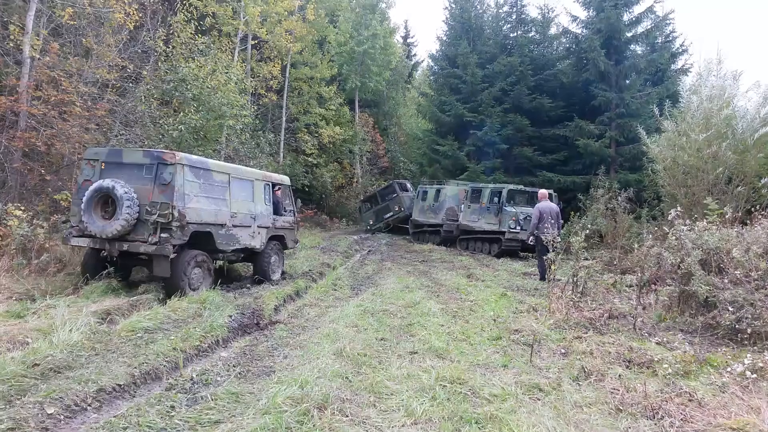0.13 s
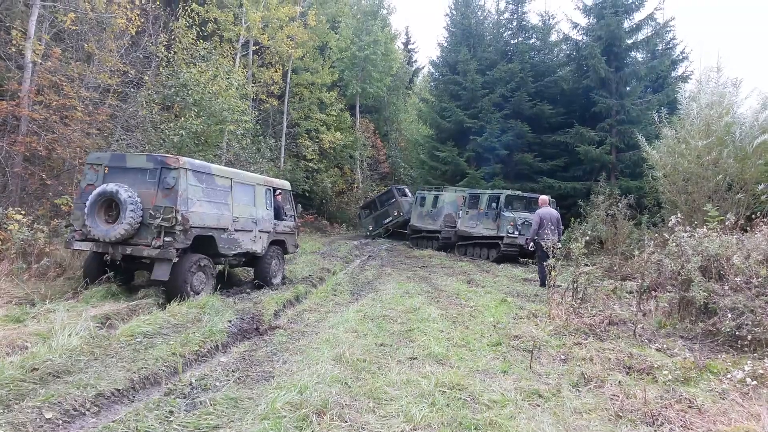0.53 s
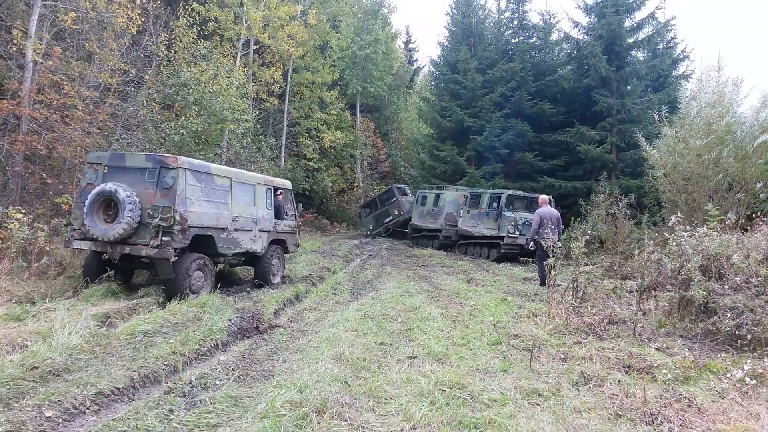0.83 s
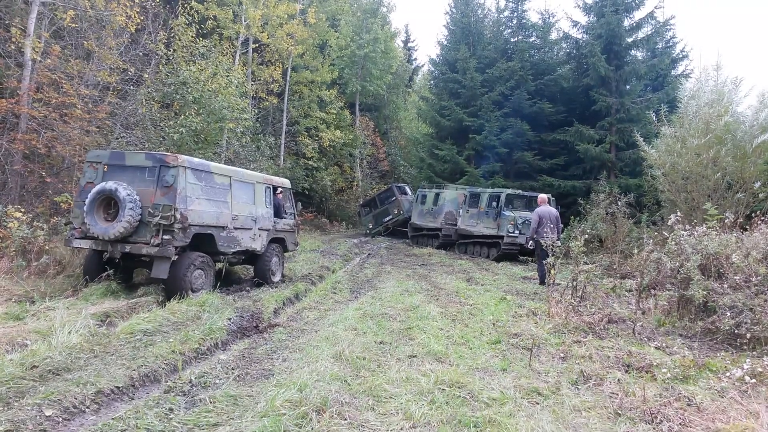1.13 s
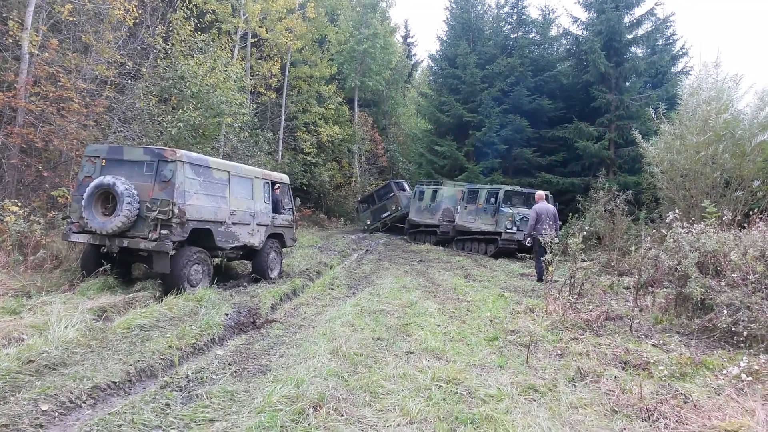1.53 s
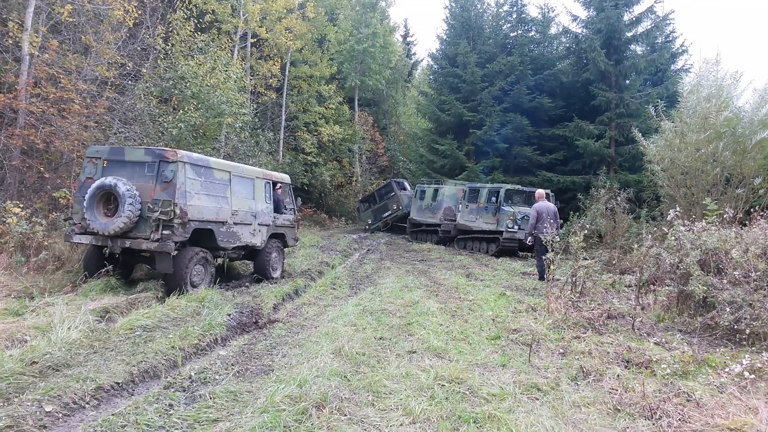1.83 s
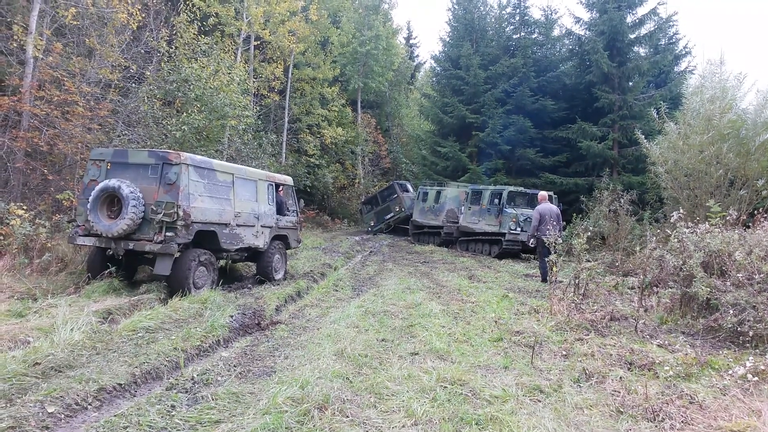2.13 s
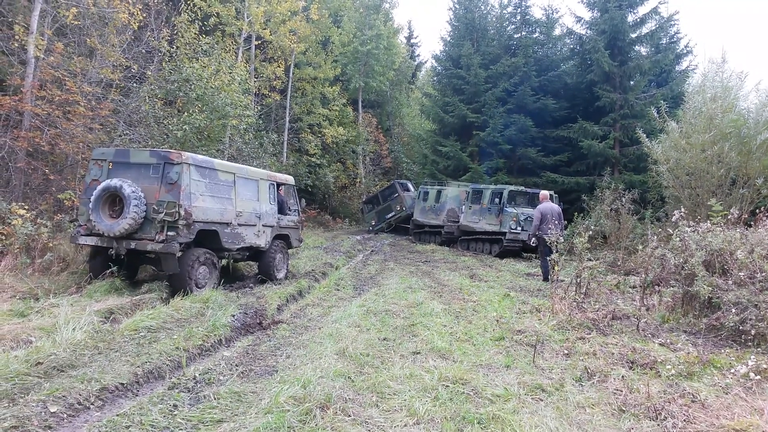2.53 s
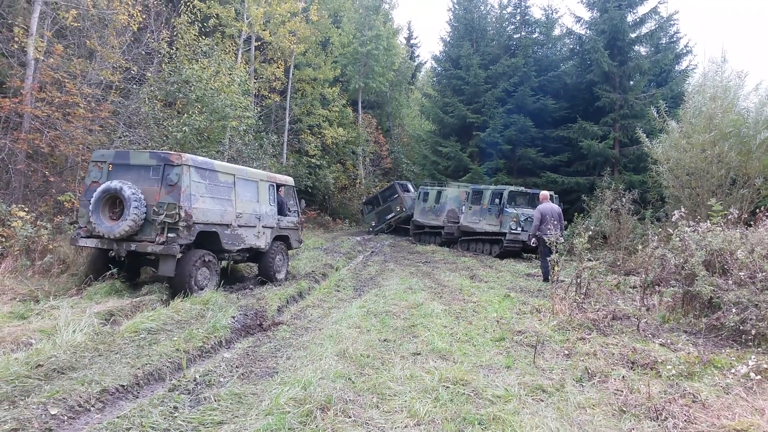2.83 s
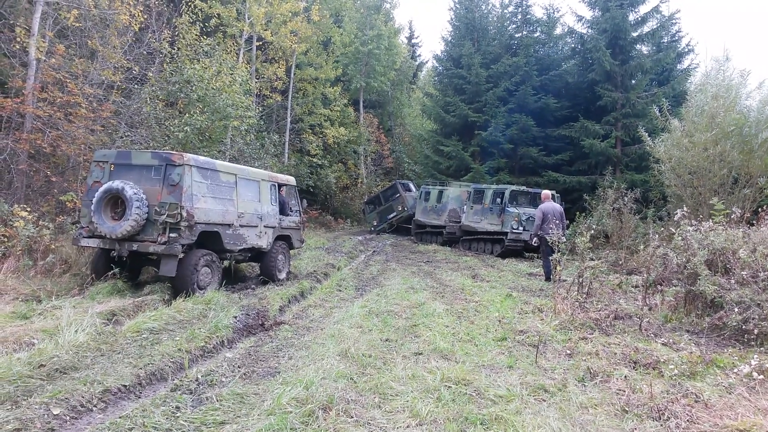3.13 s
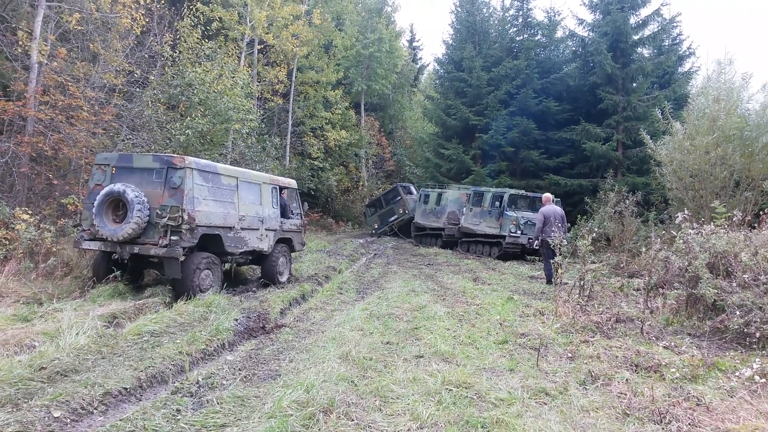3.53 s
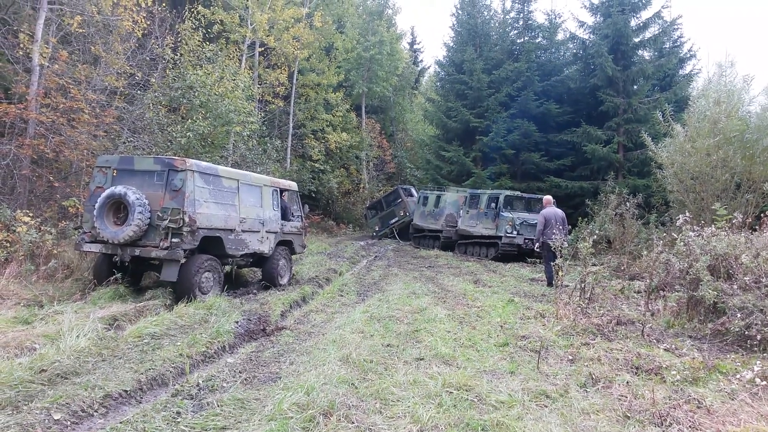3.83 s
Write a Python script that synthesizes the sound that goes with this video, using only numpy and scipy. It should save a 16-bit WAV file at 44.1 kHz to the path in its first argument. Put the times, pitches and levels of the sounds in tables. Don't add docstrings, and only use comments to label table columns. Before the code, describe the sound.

Engines of heavy off-road vehicles on a muddy forest track: a quick rise in revs, then a throaty steady rumble with fluttering diesel hiss, picked up by a small stereo microphone with uneven treble between sides.

```python
import sys
import numpy as np
from scipy import signal
from scipy.fft import rfft, irfft, next_fast_len
from scipy.io import wavfile
from scipy.ndimage import uniform_filter1d, map_coordinates

SR = 44100
rng = np.random.default_rng(int(sys.argv[2]) if len(sys.argv) > 2 else 0)


def transcribe(signal):
    frames = np.atleast_2d(signal).T
    limited = np.clip(frames, -1, 1)
    pcm = np.round(limited * 32767).astype(np.int16)
    wavfile.write(sys.argv[1], SR, pcm)


def volts_from_db(level):
    exponent = np.asarray(level, float) / 20
    return 10 ** exponent


N = 176400


def unit(x):
    return x / np.sqrt(np.mean(x ** 2) + 1e-20)


def along(points, hz):
    f, v = np.transpose(points)
    return np.interp(np.log(hz + 1), np.log(f + 1), v)


def curves(rows):
    s, *cols = np.transpose(rows)
    t = np.arange(N) / SR
    return [uniform_filter1d(np.interp(t, s, c), size=SR // 20) for c in cols]


def wobble(rate):
    knots = rng.standard_normal(int(N * rate / SR) + 4)
    return map_coordinates(knots, [np.arange(N) * rate / SR])


def filtered(x, response):
    m = next_fast_len(N + 8192)
    run_out = x[..., :-4096:-1] * np.linspace(1, 0, num=4095)
    spectrum = rfft(np.concatenate([x, run_out], axis=-1), m)
    return irfft(spectrum * response(np.fft.rfftfreq(m, 1 / SR)), m)[..., :N]


def peaks(table, hz, floor_db):
    power = volts_from_db(2 * floor_db)
    for centre, width, db in table:
        power = power + volts_from_db(2 * db) / (1 + (2 * (hz - centre) / width) ** 2) ** 2
    return np.sqrt(power)


def turns(hz):
    return 2 * np.pi * np.cumsum(hz) / SR


def puffs(hz, share):
    # frequency in Hz, left-right likeness (1 is identical).
    likeness = [(60, 0.83), (130, 0.86), (280, 1), (620, 0.84), (1340, 0.79), (2910, 0.47), (6330, 0.11),
                (13800, -1.36)]
    narrowness, scatter_db = 1.05, 2.5
    gate = ((1 + np.cos(turns(hz))) / 2) ** narrowness * volts_from_db(scatter_db * wobble(60))
    pair = rng.standard_normal((2, N)) * (1 - share + share * unit(gate))
    pair = pair * volts_from_db(0.17 * wobble(2.136) + 0.41 * wobble(11))

    def mid_side(f):
        angle = np.arccos(np.clip(along(likeness, f), -1, 1)) / 2
        return np.array([np.cos(angle), np.sin(angle)])

    mid, side = filtered(pair, mid_side)
    return np.array([mid + side, mid - side])


def orders(hz, table, gain_db):
    flutter_db, drift_rad = .7, .06
    phase = turns(hz)
    total = 0
    for k, db in table:
        level = volts_from_db(db + gain_db(k) + flutter_db * np.sqrt(k) * wobble(9))
        total = total - np.sqrt(2) * level * np.cos(k * (phase + drift_rad * wobble(4.5)))
    return total


def truck_speed():
    knot_s = [.42, .6, .75, .88, 1.01, 1.12, 1.25, 1.4, 1.7, 2.05, 2.3, 2.6, 2.85, 3.08, 3.5, 4]
    knot_hz = [34, 43.5, 52, 57.5, 62, 64.6, 66.3, 66.9, 66.1, 64, 61.5, 59, 57.8, 57.2, 57.6, 57.9]
    hz, = curves(np.transpose([knot_s, knot_hz]))
    return hz, 20 * np.log10(hz / knot_hz[-1])


def truck_exhaust(hz, effort_db):
    # multiple of the firing rate, level in dB.
    exhaust_orders = [(1, -21.5), (1.5, -36), (2, -24), (2.5, -33), (3, -29), (3.5, -33), (4, -40),
                      (4.5, -39), (5, -42), (5.5, -42), (6, -37), (6.5, -35), (7, -44), (7.5, -42),
                      (8, -46)]
    # centre in Hz, width in Hz, level in dB.
    pipe = [(63, 44, 0), (87, 14, 0), (111, 32, 0), (162, 42, 0), (225, 32, 0), (318, 24, 0), (371, 34, 0)]
    pipe_floor_db = -12
    brightens, uneven = 1.1, -1.5

    def gain_db(k):
        if k % 1:
            push_db = uneven * abs(effort_db)
        else:
            push_db = effort_db * (1.2 + brightens * np.log(k))
        return push_db + 20 * np.log10(peaks(pipe, k * hz, pipe_floor_db))

    return orders(hz, exhaust_orders, gain_db)


def truck_roar(hz, speed_db, effort_db):
    # frequency in Hz, density in dB per Hz.
    gas_colour = [(20, -36), (45, -18), (75, -15), (120, -7.5), (160, -5.5), (232, -9), (250, -11),
                  (800, -27.5)]
    # centre in Hz, width in Hz, level in dB.
    silencer = [(209.4, 11.7, -1.5), (356.5, 20, 9)]
    colour = lambda f: volts_from_db(along(gas_colour, f)) * peaks(silencer, f, 0) * (f < 1200)
    roar = unit(filtered(puffs(hz, share=0.22), colour))
    return volts_from_db(-30.5 + .4 * effort_db + 1.2 * speed_db) * roar


def truck_block(hz, speed_db):
    # centre in Hz, width in Hz, level in dB.
    panels = [(477, 77, 3.5), (551, 59, -0.5), (643, 108, 0.5), (767, 130, -10), (1026, 120, -4.5),
              (1235, 165, -4), (1612, 170, -3), (1733, 72, -0.5), (1874, 118, 2), (1965, 144, 0),
              (2311, 122, -1.5)]
    edges = lambda f: f ** 4 / (f ** 4 + 400 ** 4) / (1 + (f / 2500) ** 6)
    colour = lambda f: edges(f) * peaks(panels, f, floor_db=-8.5)
    block = unit(filtered(puffs(hz, share=0.11), colour))
    return volts_from_db(-31 + 1.5 * speed_db) * block


def truck():
    # time in seconds, effort in dB.
    throttle = [
        (.42, -3),
        (.58, -5),
        (.7, 4),
        (.82, 0),
        (.95, -2),
        (1.5, 0.5),
        (2.2, -1),
        (2.6, -1),
        (3.2, -1),
        (4, -0.5),
    ]
    hz, speed_db = truck_speed()
    effort_db, = curves(throttle)
    tone = truck_exhaust(hz, effort_db)
    return tone + truck_roar(hz, speed_db, effort_db) + truck_block(hz, speed_db)


def carrier_hiss(hz):
    # frequency in Hz, density in dB per Hz.
    left_treble = [(1800, -35.5), (2500, -11), (3300, -7), (4300, -3), (5300, -11.5), (5900, -17.5),
                   (8500, -27.5), (9650, -116)]
    right_treble = [(1800, -12), (2600, -14), (5000, -13.5), (7200, -20.5), (9400, -11.5), (11000, -16),
                    (12600, -25), (13300, -54)]
    # centre in Hz, width in Hz, level in dB.
    left_cavity = [(3690, 230, 0), (4040, 160, 3.5), (4414, 240, 1.5), (4540, 150, 0.5), (5390, 160, 7.5)]
    right_cavity = [(3530, 300, -1), (4680, 300, 6), (5700, 1000, -1), (6600, 500, 5.5), (6860, 97, -8),
                    (9440, 180, 5), (10020, 300, 3), (11560, 140, -3)]

    def colour(f):
        treble = volts_from_db([along(left_treble, f), along(right_treble, f)])
        return treble * (f > 1200) * [peaks(left_cavity, f, 0), peaks(right_cavity, f, 0)]

    hiss = unit(filtered(puffs(hz, share=0.21), colour))
    fan_db = .6 * truck_speed()[1]
    return volts_from_db(-29 + fan_db) * hiss


def carrier():
    # time in seconds, firing rate in Hz, level in dB.
    cruise = [
        (.42, 80, -27),
        (1, 78.2, -27),
        (1.5, 77, -26.5),
        (2.3, 76.5, -28),
        (2.9, 77.2, -28),
        (3.4, 78.6, -28),
        (4, 79.7, -27),
    ]
    # multiple of the firing rate, level in dB.
    drone_orders = [(1, 0), (2, -10), (3, -17), (4, -20), (5, -22)]
    hz, level_db = curves(cruise)
    return orders(hz, drone_orders, lambda k: level_db), carrier_hiss(hz)


def surge():
    # time in seconds, firing rate in Hz, level in dB.
    swells = [(.42, 82.6, -32), (.58, 77.63, -25), (.72, 70.16, -45), (.87, 61.3, -26), (1, 61.4, -37),
              (1.1, 70.6, -17), (1.2, 80.7, -25), (1.32, 94.3, -22), (1.42, 99, -48), (1.9, 96, -51),
              (2.1, 81.87, -66), (2.27, 70.9, -15.5), (2.43, 72.8, -43), (2.58, 88.6, -55), (3, 103.6, -41),
              (4, 107, -32)]
    hz, level_db = curves(swells)
    return orders(hz, [(1, 0.5), (2, -18)], lambda k: level_db)


def scene():
    # frequency in Hz, left minus right in dB.
    balance = [(60, -2), (130, -3.0), (280, -4.5), (620, -3.5), (1340, -1.5), (2910, 4.5), (6330, 2.5),
               (13800, -32.0)]
    drone, hiss = carrier()
    low = truck() + drone + surge()
    lean = lambda f: volts_from_db(along(balance, np.minimum(f, 2400)) * np.array([[.5], [-.5]]))
    return filtered(low, lean) + hiss


def low_pass(x):
    return signal.sosfilt(signal.butter(12, 14370, fs=SR, output="sos"), x)


def record(dry):
    port_top = [
        [9700],
        [13300],
    ]
    start_s, fade_s, end_s = 0.42, 0.094, .004
    t = np.arange(N) / SR
    fade_in = np.clip((t - start_s) / fade_s, 0, 1) ** .75
    fade_out = np.clip((t[-1] - t) / end_s, 0, 1)
    limited = filtered(dry, lambda f: f < np.array(port_top))
    return low_pass(limited * (fade_in * fade_out))


dry = scene()
out = record(dry)
transcribe(out)
```